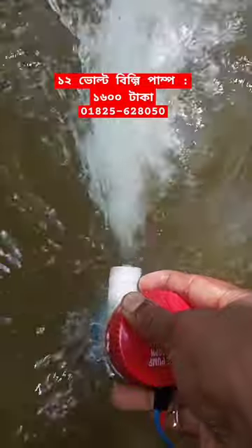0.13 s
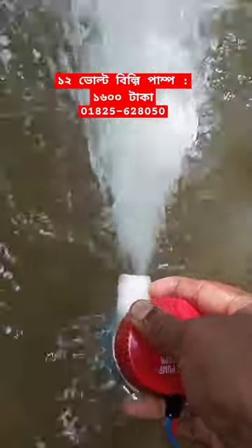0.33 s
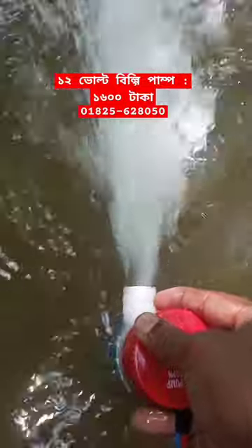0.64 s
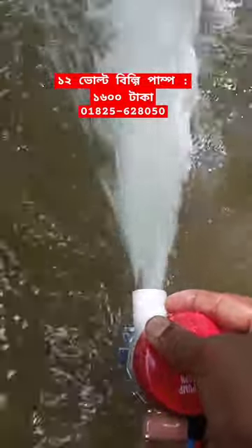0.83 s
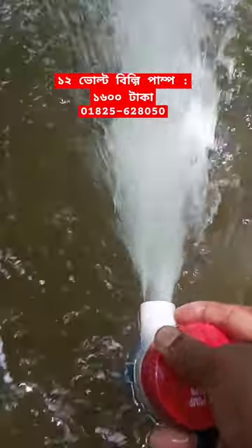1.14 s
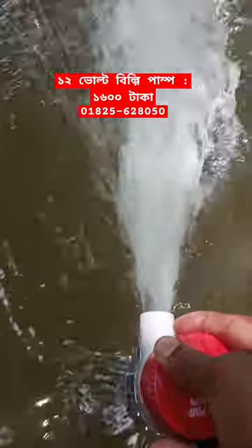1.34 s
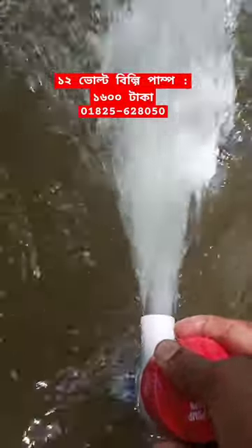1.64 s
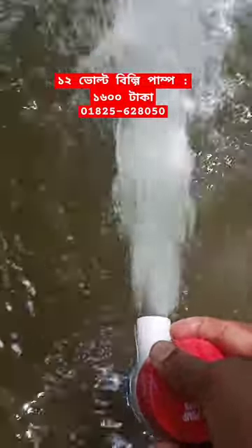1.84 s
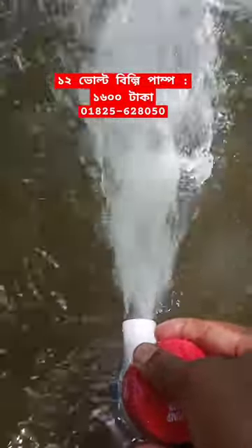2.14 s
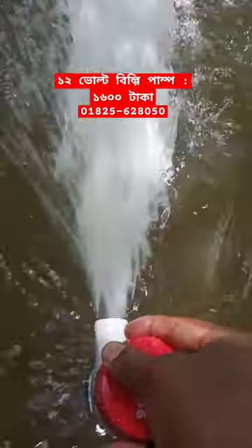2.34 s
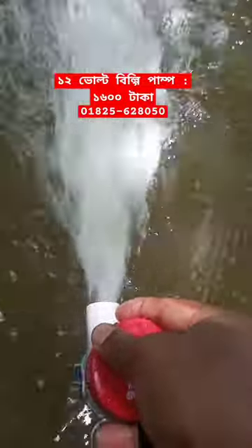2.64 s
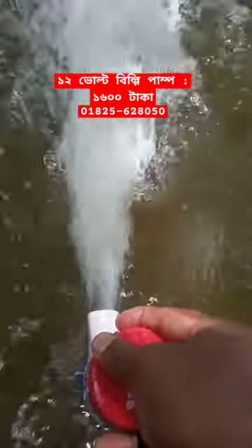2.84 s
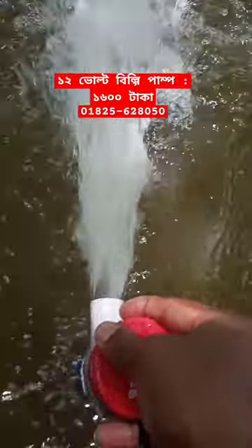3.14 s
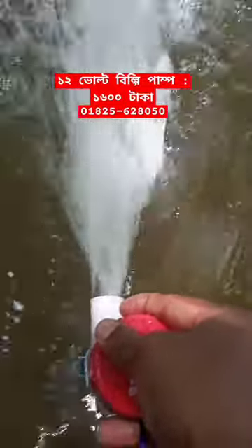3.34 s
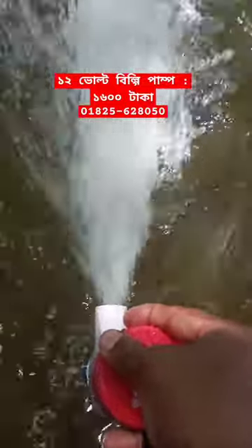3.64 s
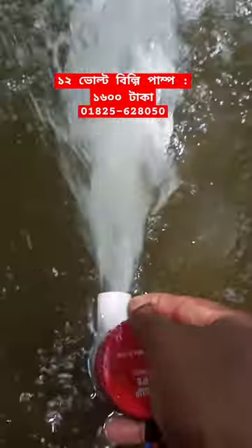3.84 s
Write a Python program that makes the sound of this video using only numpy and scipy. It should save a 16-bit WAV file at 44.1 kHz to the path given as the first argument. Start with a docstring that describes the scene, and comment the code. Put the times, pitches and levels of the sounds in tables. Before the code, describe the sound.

A pump's water jet: silence until about 0.17 s, then a rapid fade-in, full by 0.45 s. A dense, gritty mid-bright churn holds to 4 s, fluttering slightly, with thin hiss above. A faint motor whine near 450 Hz wavers underneath. Low bubbly gulps, sharp drops and short ringing splashes scatter throughout; a stronger hollow surge comes around 3.1-3.25 s. Close, dry, mono, little bass, cut off while running.

```python
"""Bilge pump at the water's surface

A small electric pump, heard close up, drives a foaming jet across murky water, fading in after a short silence.
The motor is sines on multiples of the shaft speed; churn, casing ring, slosh and spray are filtered noise and pops.
Gulps of air are clusters of rising, damped sines; spatter and splashes are short decaying noise bursts."""
import sys
import numpy as np
from scipy import signal
from scipy.fft import rfft, irfft, next_fast_len
from scipy.io import wavfile
from scipy.ndimage import uniform_filter1d, map_coordinates

SR = 44100
rng = np.random.default_rng(int(sys.argv[2]) if len(sys.argv) > 2 else 0)


def to_wav(s):
    """Save 16-bit WAV."""
    ch = np.atleast_2d(s).T  # columns
    pcm = np.round(np.clip(ch, -1, 1) * 32767)  # PCM
    wavfile.write(sys.argv[1], SR, pcm.astype(np.int16))


N = 176400
T = np.arange(N) / SR  # s


def amp(db):
    """dB to gain."""
    return 10 ** (np.asarray(db) / 20)


def unit(x):
    """Scaled to rms 1."""
    return x / np.sqrt(np.mean(x ** 2) + 1e-20)


def along(points, hz):
    """Values of (f/Hz, value) points, read off a log frequency axis."""
    f, v = np.transpose(points)
    return np.interp(np.log(hz + 1), np.log(f + 1), v)


def curves(rows):
    """One value per sample for each column after the time."""
    s, *cols = np.transpose(rows)
    return [np.interp(T, s, c) for c in cols]


def wobble(rate):
    """A smooth random curve with rate knots a second."""
    knots = rng.standard_normal(int(N * rate / SR) + 4)
    return map_coordinates(knots, [T * rate])


def filtered(x, response):
    """x times a complex response of frequency, padded so that the ringing does not wrap round."""
    m = next_fast_len(N + SR // 2)
    return irfft(rfft(x, m) * response(np.fft.rfftfreq(m, 1 / SR)), m)[..., :N]


def coloured(x, gain_db):
    """x through a minimum-phase filter of the given gain, then scaled to rms 1."""
    cep = irfft(np.log(amp(gain_db(np.fft.rfftfreq(8192, 1 / SR)))))
    # folding the cepstrum onto positive time makes the filter causal
    cep[1:4096] *= 2
    cep[4097:] = 0
    impulse = irfft(np.exp(rfft(cep)))
    return unit(signal.fftconvolve(x, impulse)[:N])


def resonance(hz, width_hz):
    """A causal resonance of peak gain 1."""
    return lambda f: 1j * f * width_hz / (hz * hz - f * f + 1j * f * width_hz)


def motor():
    """Sines locked to one unsteady shaft turn, the blade tone strongest; each level wavers on its own."""
    # Blade tone: t/s, level/dB
    blade_points = [(.45, -41), (.6, -41), (.66, -48), (.73, -38), (1.13, -44), (1.34, -39), (1.5, -42),
                    (1.92, -43), (1.96, -35), (2.1, -35), (2.27, -41), (2.37, -37), (2.45, -46),
                    (2.62, -46), (2.75, -36), (2.88, -44), (3.0, -48), (3.08, -37), (3.16, -47), (3.3, -40),
                    (3.43, -35), (3.5, -44), (4.0, -46)]
    # Other motor tones: multiple of the shaft speed, mean level/dB
    shaft_orders = [(1, -52), (7, -51), (9, -42), (11, -51), (12, -47), (14, -49), (15, -44), (16, -48),
                    (17, -43), (19, -50)]
    blades = 3
    start_hz, sag_hz_per_s = 449.5, .6  # of the blade tone
    waver_db, shaft_waver_hz = 1.5, .2
    blade_db, = curves(blade_points)
    blade_hz = start_hz - sag_hz_per_s * T
    shaft_hz = blade_hz / blades + shaft_waver_hz * wobble(25.1)
    turn = 2 * np.pi * np.cumsum(shaft_hz) / SR
    out = amp(blade_db + 2.9 * wobble(35.03)) * np.sin(blades * turn)
    for order, db in shaft_orders:
        level = amp(db + waver_db * wobble(7.6))
        out += level * np.sin(round(order) * turn + 2 * np.pi * rng.random())
    return np.sqrt(2) * out  # makes the levels rms


def froth(pop_share, patchy_db, flicker_db):
    """Foam: noise patchy in time and pitch, mixed by power with single pops of scattered size."""
    pops_per_s, pop_spread_db, pop_most = 1500, 4.5, 2.7  # pop_most caps the size, in spreads
    z = signal.stft(rng.standard_normal(N + 512), nperseg=512)[2]
    patches = uniform_filter1d(rng.standard_normal(z.shape), 3, 0)  # over frequency
    patches = uniform_filter1d(patches, 8, 1)  # over time
    noise = unit(signal.istft(z * amp(patchy_db * unit(patches)), nperseg=512)[1][:N])
    struck = rng.random(N) < pops_per_s / SR
    size_db = pop_spread_db * np.minimum(rng.exponential(size=N), pop_most)
    pops = struck * amp(size_db) * rng.choice([-1, 1], N)
    mix = np.sqrt(1 - pop_share) * noise + np.sqrt(pop_share) * unit(pops)
    return unit(mix * amp(flicker_db))


def churn(drive):
    """Churning water and popping air rattle the casing and nozzle, whose resonances lift the spectrum."""
    # Broad spectrum of the rattle: f/Hz, relative level/dB
    rattle_shape = [(30, -57), (100, -25), (300, -27), (600, -20), (860, -21), (1100, -15.5), (2100, -12.5),
                    (3000, -11.5), (4600, -15), (5100, -26), (5900, -33.5), (7000, -69.5)]
    # Casing and nozzle resonances: f/Hz, width/Hz (at half the dB lift), lift/dB
    casing_modes = [(1830, 137, 9), (2360, 120, 7), (2596, 150, 11), (3330, 280, 3.5), (3523, 600, 3),
                    (4180, 270, 1.5), (5330, 170, 7), (5730, 250, 9.5)]

    def body(f):
        lifts = sum(db / (1 + (2 * (f - hz) / width) ** 2) for hz, width, db in casing_modes)
        return along(rattle_shape, f) + lifts

    return coloured(drive, body)


def casing_ring(surge_db):
    """Froth shakes the lowest loud mode of the casing: two resonances in series on one pitch."""
    ring_hz = 1319
    shake = froth(0.17, patchy_db=2.5, flicker_db=surge_db + 1.1 * wobble(30.026))
    narrow, wide = resonance(ring_hz, 154), resonance(ring_hz, 500)
    return unit(filtered(shake, lambda f: narrow(f) * wide(f)))


def slosh(surge_db):
    """Low, strongly flickering froth."""
    # Slosh spectrum: f/Hz, relative level/dB
    slosh_shape = [(20, -38), (200, -23), (300, -19), (380, -7), (600, -14), (730, -3.5), (860, -14.5),
                   (1020, 1), (1150, -24), (1500, -30), (4000, -84.5)]
    foam = froth(0.33, patchy_db=3.5, flicker_db=surge_db + 3.0 * wobble(18))
    return coloured(foam, lambda f: along(slosh_shape, f))


def spray_and_mist(drive, surge_db):
    """Two bands of hiss from one fizz, which shares part of its noise with the churn."""
    # Spray spectrum: f/Hz, relative level/dB
    spray_shape = [(2000, -70), (4500, -29), (5900, -7), (6200, 3.5), (6450, -4), (7000, -1), (7500, 2.5),
                   (7900, -0.5), (8390, 6), (9000, -7), (9350, -1), (10000, -11.5), (11000, -19),
                   (14000, -53)]
    # Spectrum of the finest hiss: f/Hz, relative level/dB
    mist_shape = [(5000, -52), (9000, -18), (10000, -12), (11500, -2), (12200, -10), (13000, -3),
                  (14400, -6), (14800, 0), (15200, 1), (15350, -3), (16000, -6.5)]
    fizz = .5 * drive + froth(0.37, patchy_db=3.5, flicker_db=0.18 * surge_db + 1.35 * wobble(70))
    spray = coloured(fizz, lambda f: along(spray_shape, f))
    mist = coloured(fizz, lambda f: along(mist_shape, f))
    return spray, mist


def water():
    """The layers of froth at their moving levels, all following shared surges."""
    # Water levels: t/s, churn level/dB, casing ring level/dB, spray level/dB, slosh level/dB
    flow_levels = [(0.4, -23.5, -32.5, -41.5, -45), (0.43, -23.5, -30, -42.5, -36.5),
                   (0.72, -25.5, -30.5, -43.5, -35.5), (1.18, -26, -33.5, -42.5, -46),
                   (1.2, -25, -27.5, -44, -38), (1.35, -24.5, -27, -41.5, -38.5),
                   (1.37, -26, -32, -40, -51), (1.58, -24.5, -34.5, -42, -36.5),
                   (1.82, -25, -29, -44.5, -38), (1.99, -27, -34, -45.5, -40),
                   (2.38, -24, -28.5, -42.5, -35.5), (2.42, -26, -37.5, -42, -42),
                   (2.63, -23.5, -27.5, -44.5, -28.5), (2.67, -27, -32, -45.5, -38),
                   (2.76, -24.5, -33.5, -43.5, -42), (3.13, -24.5, -24, -42, -31.5),
                   (3.19, -24, -29, -45, -35), (3.24, -25, -22, -43.5, -31), (3.43, -27, -36.5, -43.5, -37),
                   (3.48, -24, -27.5, -43.5, -34), (3.9, -23.5, -29, -43, -39.5),
                   (4.0, -24, -29.5, -43, -35)]
    # Finest hiss: t/s, level/dB
    mist_levels = [(.4, -49), (1.2, -47), (2.4, -47), (2.7, -48), (4.0, -48)]
    churn_db, ring_db, spray_db, slosh_db = curves(flow_levels)
    mist_db, = curves(mist_levels)
    surge_db = 0.64 * wobble(25.07) + 0.87 * wobble(60)
    drive = froth(0.42, patchy_db=1.83, flicker_db=surge_db + 0.82 * wobble(160))
    out = amp(churn_db) * churn(drive)
    out += amp(ring_db) * casing_ring(surge_db)
    out += amp(slosh_db) * slosh(surge_db)
    spray, mist = spray_and_mist(drive, surge_db)
    return out + amp(spray_db) * spray + amp(mist_db) * mist


def bubbles(start_s, hz, level_db, cycles):
    """Damped sines that start softly and rise in pitch; a longer count of cycles decays more slowly."""
    rise = 0.19  # share of the pitch gained after that many nominal cycles
    t = np.arange(2000) / SR
    u = t * hz[:, None] / cycles
    envelope = np.exp(-u * 3) * (1 - np.exp(-u * 15))
    tone = np.sin(2 * np.pi * cycles * (u + rise * u * u / 2))
    wave = amp(level_db)[:, None] * envelope * tone
    at = np.round(start_s * SR).astype(int)[:, None] + np.arange(len(t))
    return np.bincount(at.ravel(), wave.ravel(), N + SR)[:N]


def gurgle(count=18):
    """Each gulp of air frees a dense cluster of short low bubbles; smaller ones come all the time."""
    # Gulps of air: t/s, level/dB (relative, trimmed below), length/s
    gulp_rows = [(0.439, -18, 0.04), (0.563, -14.5, 0.04), (0.687, -14.5, 0.035), (0.727, -23.5, 0.042),
                 (0.769, -18, 0.048), (1.232, -19.5, 0.04), (1.682, -35, 0.04), (2.077, -14.5, 0.034),
                 (2.149, -16.5, 0.049), (2.351, -14, 0.039), (2.596, -17, 0.037), (2.673, -20, 0.031),
                 (2.788, -15.5, 0.034), (3.036, -14, 0.04), (3.077, -21, 0.054), (3.258, -23, 0.034),
                 (3.503, -20, 0.042), (3.632, -27, 0.04), (3.746, -15.5, 0.04)]
    low_hz, high_hz = 320, 800
    trim_db, tilt_db = -12, -0.5  # the tilt is from lowest to highest pitch
    s, db, length = np.repeat(np.transpose(gulp_rows), count, axis=1)
    height, luck, delay = rng.random((len(s), 3)).T
    pitch = low_hz * (high_hz / low_hz) ** height
    level_db = db + trim_db + tilt_db * height + 8 * (luck - .5)
    gulps = bubbles(s + length * delay, pitch, level_db, 5.5)

    per_s, middle_hz, spread, least_db = 300, 558, 0.328, -48  # spread in log pitch
    place, luck = rng.random((round(per_s * N / SR), 2)).T
    pitch = middle_hz * np.exp(spread * rng.standard_normal(len(place)))
    small = bubbles(place * N / SR, pitch, least_db - 4 * np.log(1 - luck), 5.3)
    return gulps + small


def spatter():
    """Single hard drops: very short bright cracks of noise through a broad resonance, applied twice."""
    # Drops: t/s, level/dB (relative, ahead of the trim and resonance)
    drop_rows = [(0.3133, -19), (0.568, -13), (0.6455, -15.5), (0.7194, -12), (0.9992, -20), (1.2118, -19),
                 (1.3405, -14), (1.383, -13), (1.6105, -13), (1.632, -12), (2.1476, -17), (2.1731, -20),
                 (2.2499, -16), (2.2723, -22), (2.406, -16), (2.4764, -12), (2.5113, -14), (2.636, -18),
                 (2.7378, -15), (2.7597, -13), (2.7912, -12), (3.028, -13), (3.6612, -18), (3.7151, -19),
                 (3.811, -17), (3.969, -18)]
    trim_db, decay_s = -0.5, 0.0024
    out, t = np.zeros(N + SR), np.arange(SR // 50) / SR
    for s, db in drop_rows:
        crack = rng.standard_normal(len(t)) * np.exp(-t / decay_s)
        out[round(s * SR):][:len(t)] += amp(db + trim_db) * crack
    bright = resonance(3560, 2000)
    return filtered(out[:N], lambda f: bright(f) ** 2)


def splashes():
    """Slugs of water hit the nozzle: a sudden noise burst that rings one of its modes."""
    # Slugs: t/s, peak level/dB (relative, trimmed below), f/Hz of the mode
    slug_rows = [(0.5137, -18, 2600), (0.5942, -10, 1400), (0.8356, -7.5, 1290), (1.1614, -21, 2680),
                 (1.2161, -12, 2510), (1.2676, -22, 2540), (1.2851, -9.5, 2550), (1.317, -10, 1330),
                 (1.4486, -16, 1370), (1.6517, -12, 1830), (1.6758, -6.5, 1260), (1.855, -9, 2600),
                 (2.0449, -6, 2640), (2.0803, -7, 2610), (2.1556, -7.5, 1260), (2.2475, -11, 2400),
                 (2.2942, -12, 1350), (2.541, -16, 1810), (2.5918, -6, 2550), (2.6694, -14, 2510),
                 (2.7733, -6.5, 2540), (2.8211, -10, 1340), (2.9353, -13, 1280), (3.0446, -14, 1310),
                 (3.1354, -2.5, 1340), (3.1658, -36, 1270), (3.3589, -7, 2580), (3.4291, -9, 2620),
                 (3.5285, -8, 2620), (3.5838, -10, 2400)]
    trim_db, width_hz, decay_s = -8, 111, 0.014
    out, t = np.zeros(N + SR), np.arange(SR // 10) / SR
    f = np.fft.rfftfreq(len(t), 1 / SR)
    for s, db, hz in slug_rows:
        burst = rng.standard_normal(len(t)) * np.exp(-t / decay_s)
        rung = irfft(rfft(burst) * resonance(hz, width_hz)(f), len(t))
        out[round(s * SR):][:len(t)] += amp(db + trim_db) * rung / np.abs(rung).max()
    return out[:N]


def scene():
    """Pump and water together, as one channel."""
    return (motor() + water() + gurgle() + spatter() + splashes())[None]


def record(dry):
    """The microphone's view: a dip below 1 kHz and a bass cut, an uneven fade-in, then the band limit."""
    # Fade-in, silent before its first row: t/s, level/dB
    fade_points = [(.1715, -30), (.19, -18), (.24, -13), (.25, -8.5), (.3, -9.5), (.315, -5), (.45, -1)]
    dip_share, bass_cut_hz = 0.51, 74
    top_hz, top_slope_hz = 15470, 130  # 60 dB down for each step of the slope, 180 dB at most
    gain = (T >= fade_points[0][0]) * amp(curves(fade_points)[0])

    def colour(hz):
        dip = 1 - dip_share * resonance(838, 70)(hz)
        bass_cut = 1j * hz / (bass_cut_hz + 1j * hz)
        return dip * bass_cut

    def top(hz):
        return amp(-60 * np.clip((hz - top_hz) / top_slope_hz, 0, 3))

    return filtered(filtered(dry, colour) * gain, top)


dry = scene()
out = record(dry)
to_wav(out)
```